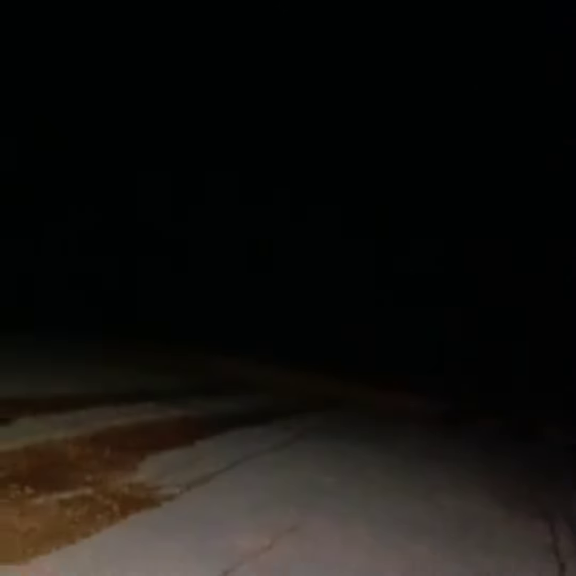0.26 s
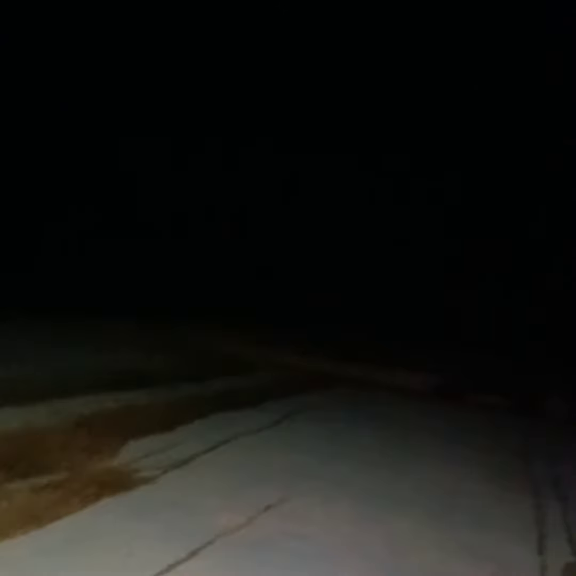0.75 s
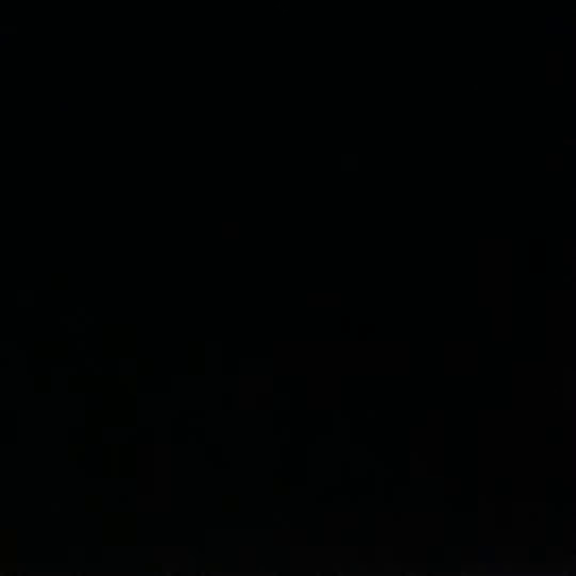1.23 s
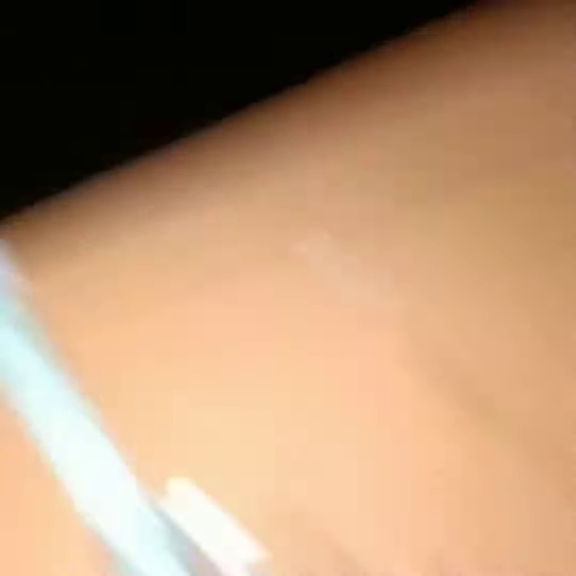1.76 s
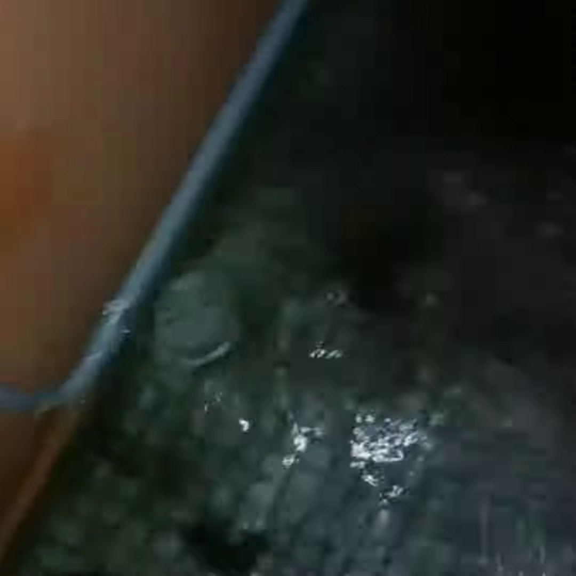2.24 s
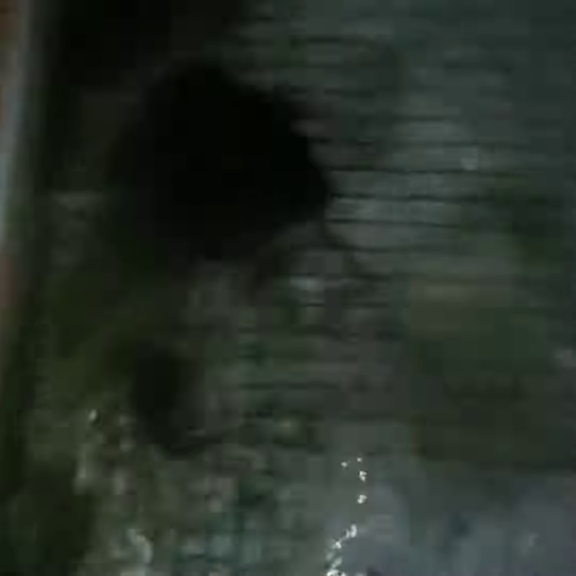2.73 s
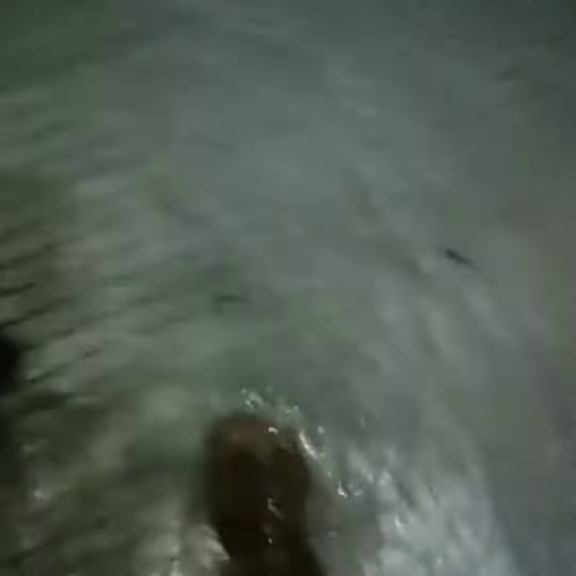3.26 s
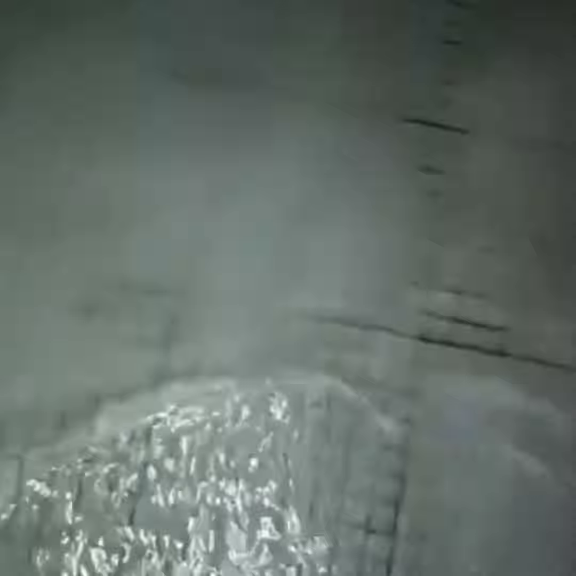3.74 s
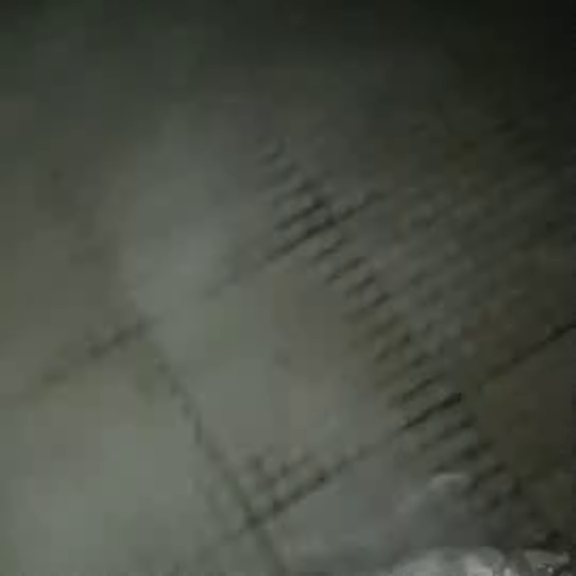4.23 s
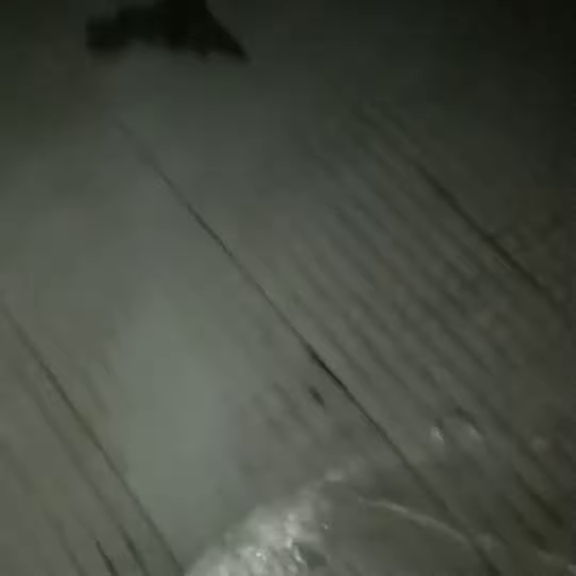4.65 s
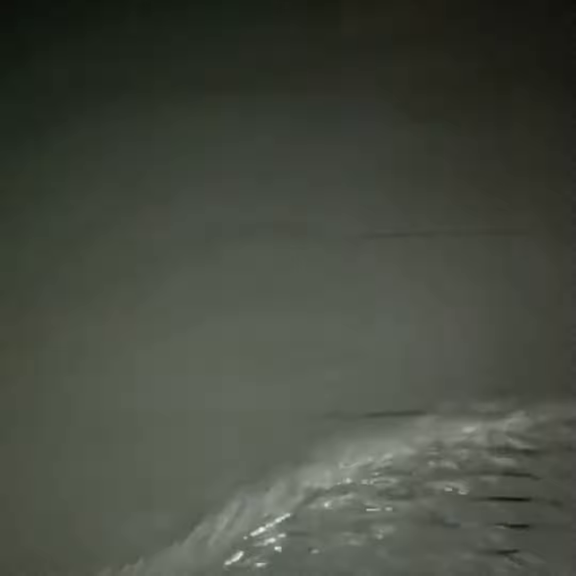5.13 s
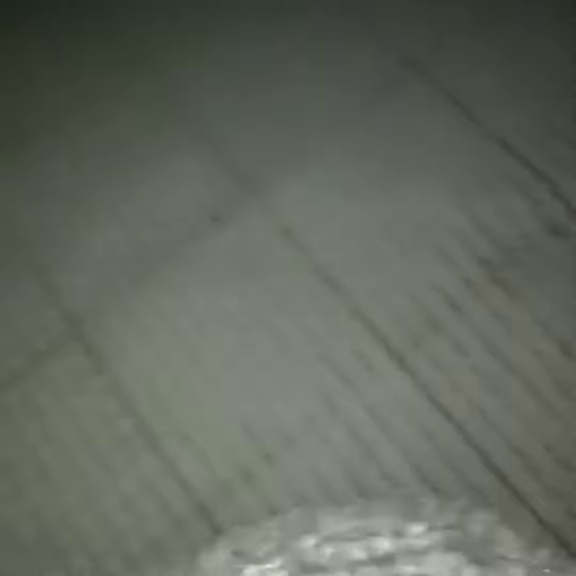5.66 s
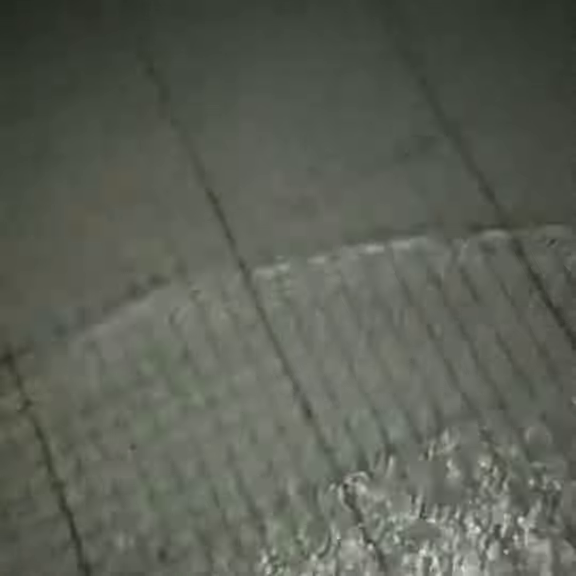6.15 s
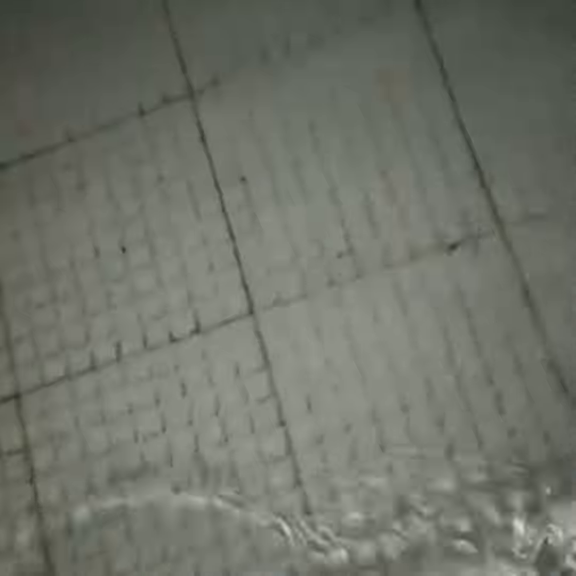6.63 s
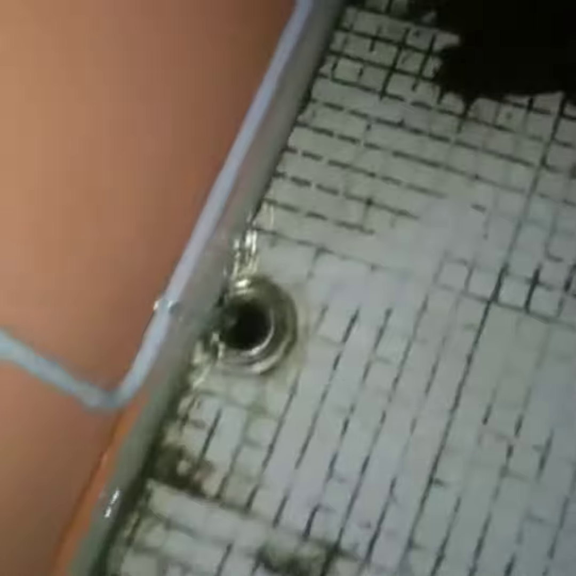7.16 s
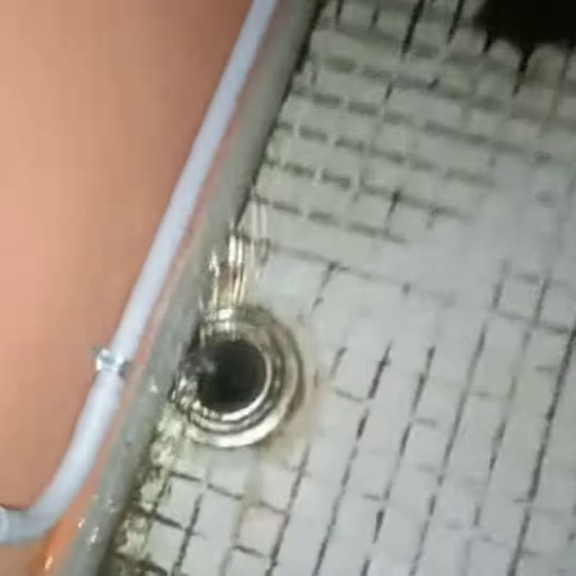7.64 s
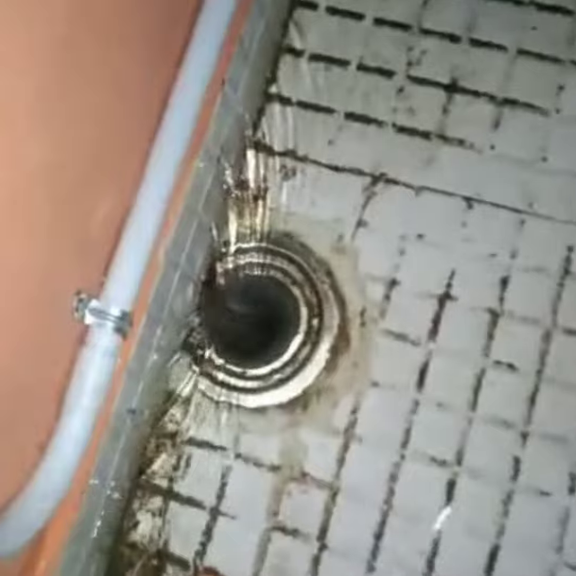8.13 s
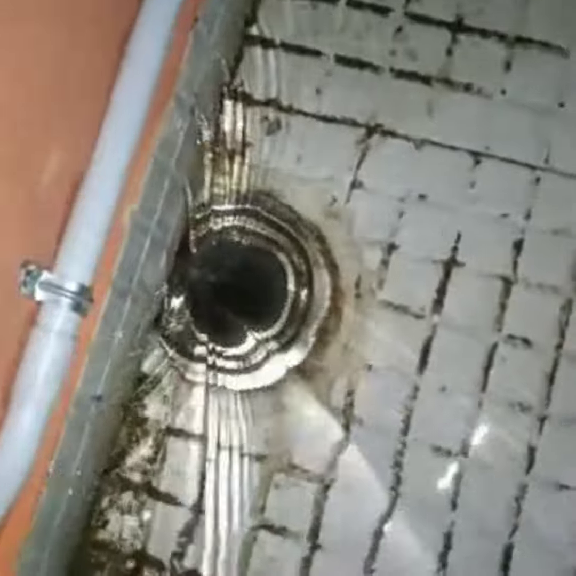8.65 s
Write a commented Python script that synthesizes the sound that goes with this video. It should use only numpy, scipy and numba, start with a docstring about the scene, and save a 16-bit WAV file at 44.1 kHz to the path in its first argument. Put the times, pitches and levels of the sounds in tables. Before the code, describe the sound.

Quiet night hum with a trilling cricket, then feet slosh and plop through shallow rainwater; brief silence, then water rushes loudly down a floor drain.

```python
"""Low machine hum, town rumble and a trilling cricket at night on a flooded tiled terrace: noise and sines.
Feet wade through shallow rainwater: filtered impacts slosh, decaying sines plop, short rings and puffs tick.
After a short silence the phone is close to a floor drain: impacts through drifting pipe resonances rush,
sliding sines glug, noise booms, and delayed copies echo off the tiles and kerb."""
import sys
import numpy as np
from scipy import signal
from scipy.fft import rfft, irfft
from scipy.io import wavfile
from scipy.ndimage import uniform_filter1d, map_coordinates
from numba import njit

SR = 44100
rng = np.random.default_rng(int(sys.argv[2]) if len(sys.argv) > 2 else 0)


def persist_wave(psi):
    """Save psi, clipped to +-1, as 16-bit WAV."""
    counts = np.round(np.clip(psi, -1, 1) * 32767).astype(np.int16)
    wavfile.write(sys.argv[1], SR, np.atleast_2d(counts).T)


N = 392049

# night layers: t/s, rumble level/dB, hum level/dB, far hiss level/dB
NIGHT_LEVELS = [(0.0, -44.5, -43, -49), (1.06, -42.5, -43, -56.5), (1.7, -43.5, -46, -56),
                (2.26, -42, -50, -57), (2.88, -40, -37, -53.5), (3.3, -46, -48.5, -49),
                (4.25, -45.5, -44.5, -57.5), (4.47, -45, -37, -52), (5.7, -45, -41.5, -55.5),
                (6.33, -44, -46, -54.5), (6.55, -40.5, -57, -52)]
# rumble spectrum: f/Hz, level/dB per Hz
RUMBLE_SPECTRUM = [(12, -66), (20, -31.5), (37, -20), (82, -7), (129, -3), (150, -2), (195, -7), (241, -5),
                   (299, -9.5), (600, -15), (780, -25.5), (1320, -52)]
# weaker steady hums: f/Hz, level/dB
WEAK_HUMS = [(75.3, -54), (100, -51), (113, -48), (125, -54), (188, -56), (226, -54), (243, -54)]
# far insects and dripping roofs, spectrum: f/Hz, level/dB per Hz
FAR_SPECTRUM = [(290, -33.5), (500, -12), (890, -7), (1150, -1.5), (2300, 1.5), (4160, -30), (5320, -1),
                (5630, -13), (6050, -19.5), (7730, -10), (10800, -52), (14800, -48.5), (15700, -46.5)]
# chirps of the near cricket: t/s, level/dB
CHIRP_EVENTS = [(.005, -53), (.056, -48), (0.106, -48), (.19, -45.5), (.285, -48), (.376, -48),
                (0.456, -49), (.488, -50), (.545, -49), (.566, -49), (.658, -46.5), (.729, -49),
                (.821, -52), (.913, -52.5), (1.014, -51), (1.1, -60), (1.2, -59), (1.292, -62), (1.38, -64),
                (1.5, -59)]
# wing strokes of one chirp: level/dB re chirp
STROKE_LEVELS_DB = [3, 1.5, -3.5, -10]
# thin hisses: start t/s, end t/s, level/dB, low f/Hz, high f/Hz
AIRY_BANDS = [(.82, 1.7, -67, 12800, 17000), (.46, 1.2, -63.5, 6900, 8100)]
# wading: t/s, slosh level/dB, spray level/dB re slosh, fizz level/dB re slosh
WADE_LEVELS = [(0.0, -56, 0, 0), (0.85, -51, -12.5, -8.5), (1.15, -44, -17.5, -17.5),
               (1.5, -49, -17.5, -15), (1.9, -47, -14, -18), (2.19, -35.5, -17, -21),
               (2.52, -40.5, -15, -10.5), (2.66, -40.5, -16, -12), (2.81, -44.5, -15.5, -14),
               (3.08, -41, -14, -12.5), (3.24, -29.5, -21, -21), (3.45, -41, -16.5, -7.5),
               (3.98, -43, -18, -12.5), (4.07, -35.5, -20, -15), (4.5, -42.5, -15.5, -10.5),
               (4.9, -44, -19.5, -12.5), (5.1, -33.5, -23.5, -15), (5.45, -35.5, -24, -25),
               (5.62, -34, -21.5, -16), (5.87, -34.5, -21, -24.5), (6.0, -46.5, -19, -15.5),
               (6.1, -47.5, -14.5, -18), (6.2, -37.5, -24, -27), (6.32, -38.5, -19, -21),
               (6.4, -32, -20.5, -15), (6.55, -39.5, -18.5, -17)]
# slosh spectrum: f/Hz, level/dB per Hz
SLOSH_SPECTRUM = [(120, -55.5), (200, -19.5), (241, -8.5), (308, -2.5), (415, -4.5), (888, -3),
                  (1290, -4.5), (2030, -2.5), (2800, -12.5), (3640, -36.5), (6160, -120)]
# spray spectrum: f/Hz, level/dB per Hz
SPRAY_SPECTRUM = [(3500, -31), (5000, -4), (6200, -16.5), (7500, -12.5), (9200, -8), (10800, -17),
                  (14800, -23), (15700, -25)]
# spray drops on tiles: t/s, ring peak level/dB, ring f/Hz, splat level/dB
TICK_EVENTS = [(0.9113, -37, 10100, -37), (1.659, -35, 9500, -33.5), (1.7815, -31, 10500, -59),
               (1.821, -37, 9300, -28), (2.062, -38, 4500, -45), (2.081, -41, 7400, -34),
               (2.18, -34, 5940, -34), (2.2398, -37, 8870, -31), (2.264, -33, 8100, -47),
               (2.3192, -32, 8950, -33), (2.326, -35, 5100, -54), (2.345, -34, 3800, -47),
               (2.373, -36, 7960, -40.5), (2.4122, -32, 8650, -27), (2.428, -40, 4670, -36),
               (2.439, -29, 9200, -29), (2.4687, -32, 8700, -59), (2.5084, -36, 9400, -38),
               (2.604, -36, 6750, -30), (3.154, -45, 7400, -26), (3.42, -35, 8400, -45),
               (3.4746, -36, 8900, -52), (3.5336, -39, 9000, -30), (4.3046, -33.5, 8920, -60),
               (4.9044, -38, 6900, -29), (5.3527, -39, 5050, -36), (5.624, -53, 9250, -21.5),
               (5.667, -41, 7300, -21.5), (5.726, -34, 8650, -27), (5.8697, -37, 8790, -59),
               (6.453, -40, 8790, -54)]
# big bubbles: t/s, peak level/dB, f/Hz, life/ms (clipped to 26), pitch rise/share per life
PLOP_EVENTS = [(1.556, -40, 2110, 4.4, 0.033), (1.643, -18.5, 754, 9.1, -0.13),
               (1.652, -21, 1314, 7.7, 0.2), (1.672, -31, 810, 6.1, -0.047), (1.691, -17.5, 710, 5.8, 0.11),
               (1.709, -29, 2620, 1.8, -0.43), (1.719, -27.5, 450, 11, 0.14),
               (1.757, -39.5, 2730, 5.3, 0.1), (1.826, -24.5, 1433, 11, 0.013),
               (1.882, -33, 2040, 5, 0.054), (1.925, -32.5, 724, 12, 0.22), (1.953, -34, 2940, 3.2, -0.037),
               (1.956, -20, 1550, 6.3, -0.19), (1.971, -26.5, 696, 8.6, 0.3),
               (1.973, -29, 2070, 7.2, -0.13), (2.043, -22.5, 809, 24, -0.13),
               (2.055, -19, 1830, 5.6, -0.35), (2.066, -21.5, 2480, 2.4, -0.073),
               (2.079, -21.5, 1747, 16, -0.42), (2.095, -23.5, 945, 10.2, 0.61),
               (2.074, -28, 800, 14, -0.021), (2.125, -34, 1950, 4, -0.11), (2.094, -33, 2900, 3.5, 0.006),
               (2.136, -14.5, 2100, 4.3, -0.071), (2.169, -29, 1040, 4.8, -0.065),
               (2.177, -26.5, 3050, 3.1, 0.04), (2.183, -19, 916, 16, -0.025),
               (2.241, -28.5, 2580, 5.1, -0.041), (2.255, -25.5, 1080, 6.3, -0.072),
               (2.287, -19.5, 910, 3.3, -0.33), (2.291, -31, 3240, 3.7, -0.068),
               (2.3, -28, 2300, 4.3, -0.18), (2.317, -20.5, 790, 3.7, 0.29), (2.348, -30.5, 904, 16, -0.1),
               (2.305, -26, 1610, 6.7, -0.067), (2.365, -25, 770, 13.7, 0.25),
               (2.376, -19, 2210, 4, -0.082), (2.41, -30, 1550, 3.8, 0.062),
               (2.425, -21.5, 1475, 6.2, 0.089), (2.441, -20.5, 1400, 5.7, 0.11),
               (2.443, -12.5, 2014, 5, 0.025), (2.455, -30.5, 760, 12, 0.035),
               (2.498, -31, 850, 9.3, 0.064), (2.52, -28.5, 720, 10, 0.041), (2.521, -29, 1460, 4, -0.11),
               (2.534, -29, 1900, 4.5, 0.12), (2.544, -22, 2640, 2.1, 0.088),
               (2.567, -29.5, 620, 15, 0.038), (2.569, -27, 1550, 3, 0.2), (2.606, -14, 1774, 4.4, 0.088),
               (2.608, -30, 630, 32, 0.19), (2.72, -27, 710, 6.7, -0.038), (2.758, -27.5, 2050, 1.1, -0.17),
               (2.76, -17, 535, 5.6, -0.054), (3.019, -27, 1910, 5.9, 0.1), (3.071, -33, 1210, 5, -0.049),
               (3.104, -21, 460, 3.8, -0.062), (3.15, -19.5, 1600, 3.5, -.12),
               (3.188, -25.5, 1305, 10.6, 0.16), (3.214, -22, 2160, 5.6, -0.051),
               (3.225, -19.5, 1930, 3, -0.016), (3.246, -26.5, 1240, 16, -0.34),
               (3.257, -29, 505, 17, 0.14), (3.27, -22.5, 734, 11, -0.033), (3.312, -32, 1980, 5.4, 0),
               (3.368, -31, 2070, 5.7, 0.056), (3.418, -28, 2410, 4, 0.031), (3.42, -35.5, 2960, 7.3, 0.24),
               (3.436, -22, 2250, 1.7, -0.13), (3.529, -36, 1270, 30, .14), (3.544, -28.5, 1590, 4.5, -0.1),
               (3.668, -34, 2150, 8, -0.077), (3.721, -39, 985, 15, 0), (3.826, -39, 2210, 8.2, 0),
               (3.874, -35, 824, 6, 0.17), (3.887, -27.5, 940, 4.1, 0.055), (4.031, -27, 1610, 11, -0.062),
               (4.031, -20.5, 1200, 9.1, -0.11), (4.1, -32.5, 1056, 30, 0.053),
               (4.151, -31, 915, 8.4, 0.083), (4.172, -24, 604, 4.9, -0.067),
               (4.245, -25, 675, 12.5, -0.03), (4.268, -31, 700, 7, -0.28), (4.293, -30, 934, 4.4, -0.4),
               (4.321, -30, 715, 8, 0.054), (4.346, -30, 1610, 3, -0.033), (4.41, -31, 800, 5.5, -0.13),
               (4.383, -32.5, 670, 19, -0.14), (4.451, -23, 1470, 1.7, 0.72),
               (4.467, -32.5, 818, 20, -0.085), (4.667, -32, 2030, 9.8, 0.018),
               (4.792, -32, 1340, 4.3, -0.028), (4.982, -22, 1076, 8.7, 0.037),
               (5.034, -23.5, 1265, 12, -0.028), (5.09, -28, 818, 20, 0.8), (5.053, -19.5, 1250, 4, -0.19),
               (5.115, -18.5, 1160, 4.5, -0.092), (5.124, -21, 1400, 3.5, -0.49),
               (5.172, -20.5, 1010, 4.8, 0.17), (5.245, -31, 1210, 26, 0.0082),
               (5.27, -27, 806, 11.5, -0.072), (5.352, -23, 2050, 2.7, 0.035),
               (5.378, -24.5, 2040, 8, -0.012), (5.403, -19.5, 1750, 9.3, -0.054),
               (5.421, -18.5, 2240, 9.3, -0.18), (5.424, -25, 1530, 7.6, -0.35),
               (5.494, -26.5, 995, 10.6, 0.65), (5.54, -23.5, 780, 24.5, 1), (5.62, -23, 2000, 3, 0.13),
               (5.66, -31.5, 490, 15, -0.17), (5.67, -22, 2100, 3.9, -0.095), (5.696, -33, 1053, 31, 0.33),
               (5.801, -16, 1875, 8, -0.18), (5.806, -23, 1880, 5.7, 0.31), (5.813, -13, 1400, 5.9, 0.37),
               (5.848, -29.5, 860, 20, -0.79), (5.859, -25.5, 422, 28, 0.048),
               (5.964, -26, 1490, 7.1, 0.12), (6.123, -32.5, 716, 7.2, -0.16),
               (6.169, -27, 852, 9.4, -0.0047), (6.194, -27, 710, 7.6, -0.14), (6.294, -33, 970, 11, -0.12),
               (6.145, -21, 1005, 6.2, -0.032), (6.181, -21, 1610, 10, -0.21),
               (6.359, -13, 1460, 1.3, 0.14), (6.371, -26, 1710, 7.6, 0), (6.414, -26, 1520, 6.5, 0.26),
               (6.498, -32, 1910, 9.4, -0.052), (6.517, -27, 1580, 6.6, 0.022),
               (6.559, -20, 610, 2.2, -0.07), (6.552, -26.5, 1160, 27, 0.48),
               (6.621, -23, 1750, 3.4, -0.15), (6.65, -28, 1350, 5.5, 0.03)]
# drain: t/s, rush level/dB
DRAIN_LEVELS = [(6.96, -23.5), (7.324, -19.5), (7.5, -21), (8.652, -19), (8.75, -20.5), (8.862, -18.5)]
# rush spectrum: f/Hz, level/dB per Hz
RUSH_SPECTRUM = [(150, -17), (250, -1.5), (313, -8.5), (443, -9), (983, -11.5), (1370, -21), (2020, -2),
                 (2450, -26), (2810, -11), (3200, -15), (3480, -17), (3820, -22), (4250, -81), (6000, -38),
                 (7800, -28.5), (13200, -120)]
# drain pipe air, shifting as the phone nears: first f/Hz, last f/Hz, width/Hz, first level/dB, last level/dB
PIPE_MODES = [(796, 646, 100, -10.5, -24), (1254, 1028, 230, -0.5, -5), (1524, 1446, 164, -4.5, -7.5),
              (1795, 1930, 170, -4, -11), (1952, 2018, 300, 2.5, 1)]
# drain fizz spectrum: f/Hz, level/dB per Hz
FIZZ_SPECTRUM = [(2350, -40), (4000, 4.5), (4240, -6), (4480, 1.5), (4830, -4.5), (5800, -6.5),
                 (7990, -4.5), (9160, 8.5), (10500, -7.5), (13400, -13), (15700, -17)]
# tile and kerb echoes: lag/ms, drift/ms as the hand moves, level/dB
DRAIN_ECHOES = [(0.548, 0.06, -9), (1.902, 0.08, -9), (2.4, .08, -9.5), (3.2, 0.08, -5)]
# pipe boom spectrum: f/Hz, level/dB per Hz
BOOM_SPECTRUM = [(12, -76), (20, -48), (37, -24), (62, -15.5), (80, 2), (152, 2), (248, -7), (311, -22.5),
                 (400, -9.5), (520, -49), (880, -120)]
# glugs: t/s, peak level/dB, f/Hz
GLUG_EVENTS = [(6.991, -9, 1900), (7.067, -9, 1220), (7.079, -10, 1950), (7.123, -9, 1930),
               (7.176, -15, 1960), (7.252, -17, 1900), (7.317, -12, 1830), (7.383, -20, 1930),
               (7.527, -16, 1900), (7.537, -7, 1830), (7.634, -9, 2020), (7.644, -9, 1200),
               (7.769, -9, 1090), (7.878, -8, 1120), (7.946, -6.5, 2000), (8.025, -12.5, 1100),
               (8.056, -10, 2030), (8.136, -7, 2000), (8.243, -4.5, 1940), (8.272, -7, 1070),
               (8.314, -7.5, 1870), (8.428, -8, 1850), (8.643, -7, 1920), (8.727, -15, 2100),
               (8.852, -6, 750), (8.861, -12, 1970)]

SILENCE_START_S, SILENCE_END_S = 6.666, 6.956
TOP_HZ = 15800
HUM_HZ = 151.2
CHIRP_HZ, STROKES_PER_S, CHIRP_FALL_HZ_PER_LIFE = 5730, 49, 622
BUBBLE_HZ, BUBBLE_WANDER_OCT, BUBBLE_WANDERS_PER_S = 1144, 0.509, 8
GURGLE_DB, STIRRED_FROM_S = -4.5, 1.55
PATCH_DB, PATCH_S, PATCH_OCT = 4, .035, 0.451
PING_DB, PING_HZ, PING_OCT = -12.5, 8950, .25
WOBBLE_DB, WOBBLES_PER_S = 1.8, 300
SPATTER_DB, SPATTER_S, SPATTER_HZ = -20, 0.012, 1897  # level re plop peak
PIPE_DB = 1.5
FIZZ_DB, FIZZ_START_DB, FIZZ_BUILD_S = -17.5, -3.5, 0.16  # start re final level
MIST_DB, MIST_HZ, MIST_PEAK_S, MIST_SLOPE_DB_PER_S = -19.5, 6500, 0.26, 24
GUST_DB, GUSTS_PER_S = 1.1, 40
BOOM_DB, BOOM_GROWS_DB_PER_S = -8.5, 1  # the phone comes nearer to the pipe mouth
GLUG_LIFE_MS, GLUG_RISE_SHARE = 3.8, 0.013
KNOCK_DB, KNOCK_MS = -1.5, 1


def undb(db):
    """Amplitude from dB."""
    return 10 ** (np.asarray(db) / 20)


def unit(x):
    """Scale to rms 1."""
    return x / np.sqrt(np.mean(x ** 2))


def curves(table):
    """Interpolate each column over time, per sample."""
    s, *columns = np.transpose(table)
    return [np.interp(np.arange(N) / SR, s, c) for c in columns]


def colour(x, spectrum):
    """Causal minimum-phase filter of the given shape, from the folded cepstrum; rms 1."""
    hz, db = np.transpose(spectrum)
    log_hz = np.log(np.maximum(np.fft.rfftfreq(8192, 1 / SR), 1))
    shape_db = np.interp(log_hz, np.log(hz), db, left=db[0] - 30.5, right=db[-1] - 37.0)
    cepstrum = irfft(shape_db * np.log(10) / 20)
    cepstrum[1:4096] *= 2
    response = irfft(np.exp(rfft(cepstrum[:4097], 8192)))
    return unit(signal.fftconvolve(x, response)[:N])


def bandpass(x, order, low_hz, high_hz):
    """Butterworth band-pass."""
    return signal.sosfilt(signal.butter(order, [low_hz, high_hz], "band", fs=SR, output="sos"), x)


def highpass(x, order, hz):
    """Butterworth high-pass."""
    return signal.sosfilt(signal.butter(order, hz, "high", fs=SR, output="sos"), x)


def walk(rate):
    """Straight ramps between random levels, one every 1 / rate s; rms 1."""
    k = int(SR / rate)
    held = np.repeat(rng.standard_normal(N // k + 1), k)
    return unit(uniform_filter1d(held, k)[:N])


def sizes(spread_db, count):
    """Amplitudes: many small, few large, none huge."""
    return undb(spread_db * np.minimum(rng.exponential(size=count), 3.5))


def patter(rate, spread_db, hiss):
    """Random droplet impacts over a share of smooth hiss."""
    hits = (rng.random(N) < rate / SR) * rng.standard_normal(N) * sizes(spread_db, count=N)
    return unit(hits) + hiss * rng.standard_normal(N)


def sizzle(rate, spread_db, hiss):
    """Droplets as brief soft-edged puffs of noise over smooth hiss."""
    hits = (rng.random(N) < rate / SR) * sizes(spread_db, count=N)
    puffs = signal.fftconvolve(hits, np.hanning(SR // 200), "same")
    return (unit(puffs) + hiss) * rng.standard_normal(N)


@njit
def ring(n, start, size, hz, life_s, rise, swell, fade):
    """Sines that swell, fade over their life and slide in pitch, as bubbles do near the surface."""
    y = np.zeros(n)
    for k in range(len(start)):
        length, phase = life_s[k] * SR, 0.
        for i in range(min(int(3 * length), n - start[k])):
            u = i / length
            phase += 2 * np.pi * hz[k] * (1 + rise[k] * min(u, 1.2)) / SR
            envelope = min(u / swell, 1.) * np.exp(-fade * max(u - swell, 0.) ** 1.5)
            y[start[k] + i] += size[k] * np.sin(phase) * envelope
    return y


def big_bubbles(s, db, hz, life_ms, rise, swell, fade):
    """Single bubbles at given times, lives held to 1-26 ms."""
    life_s = np.clip(life_ms, 1, 26) / 1000
    return ring(N, (s * SR).astype(np.int64), undb(db), hz, life_s, rise, swell, fade)


def swarm(centre_hz, octaves, cycles, spread_db, count):
    """Many small bubbles scattered in time, with pitches around a moving centre; rms 1."""
    when, life, slide = rng.random((count, 3)).T
    start = (when * N).astype(np.int64)
    hz = np.clip(centre_hz[start] * 2 ** (octaves * rng.standard_normal(count)), 350, 3400)
    life_s = cycles * (0.61 + life) / hz
    return unit(ring(N, start, sizes(spread_db, count=count), hz, life_s, 0.312 * slide - .1, 0.12, 0.62))


def machine_hum(level_db):
    """Machine hums: steady sines, each drifting in level."""
    t = np.arange(N) / SR
    hum = undb(level_db + .7 * walk(3)) * np.sin(2 * np.pi * HUM_HZ * t)
    for hz, db in WEAK_HUMS:
        hum = hum + undb(db + 2 * walk(1.5)) * np.sin(2 * np.pi * hz * t)
    return np.sqrt(2) * hum  # dB are rms


def town_rumble(level_db):
    """Town rumble: low coloured noise of wandering level."""
    return colour(rng.standard_normal(N), RUMBLE_SPECTRUM) * undb(level_db + 1.1 * walk(5.4))


def far_hiss(level_db):
    """Blurred hiss of far insects and dripping roofs: coloured noise."""
    return undb(level_db) * colour(rng.standard_normal(N), FAR_SPECTRUM)


def cricket():
    """Chirps of a few wing strokes, each a short tone that falls in pitch; walls nearby echo them."""
    chirp_s, chirp_db = np.transpose(CHIRP_EVENTS)
    s = (chirp_s[:, None] + np.arange(len(STROKE_LEVELS_DB)) / STROKES_PER_S).ravel()
    db = (chirp_db[:, None] + STROKE_LEVELS_DB).ravel()
    size = undb(db + 1.2 * rng.standard_normal(len(s)))
    hz = CHIRP_HZ * (1 + 0.0166 * rng.standard_normal(len(s)))
    fall = -CHIRP_FALL_HZ_PER_LIFE / hz
    strokes = ring(N, (s * SR).astype(np.int64), size, hz, np.full(len(s), 0.0105), fall, 0.44, 1.3)
    direct = strokes * undb(2.5 * walk(400))  # rough wings
    first_echo = undb(-6.5) * np.roll(direct, int(0.01 * SR))
    return direct + first_echo + undb(-9) * np.roll(direct, int(0.024 * SR))


def slosh(stirred):
    """Sloshing water: impacts, small bubbles once the feet stir it, and bursting droplets."""
    centre_hz = BUBBLE_HZ * 2 ** (BUBBLE_WANDER_OCT * walk(BUBBLE_WANDERS_PER_S))
    wash = colour(patter(1700, 1.1, 0.69), SLOSH_SPECTRUM) * undb(2 * walk(40))
    gurgle = colour(swarm(centre_hz, 0.5944, 12, 2.0, count=1500), SLOSH_SPECTRUM)
    # droplets burst after a few cycles
    crackle = colour(swarm(1.287 * centre_hz, 0.592, 3.93, 0.99, count=5000), SLOSH_SPECTRUM)
    mix = undb(-13) * wash + stirred * undb(GURGLE_DB) * gurgle + undb(-3) * crackle
    return undb(stirred * walk(16)) * mix


def spray(stirred):
    """Treble spray: noise puffs over hiss, plus tiny ringing droplets once the water is stirred."""
    puffs = colour(sizzle(83, 3.7, 3.9), SPRAY_SPECTRUM) * undb(walk(30))
    return puffs + stirred * undb(PING_DB) * pings(count=400)


def pings(count):
    """Tiny droplets, each a few cycles of a high tone; rms 1."""
    hz = np.clip(PING_HZ * 2 ** (PING_OCT * rng.standard_normal(count)), 4000, 15000)
    start = rng.integers(N, size=count)
    return unit(ring(N, start, sizes(3, count=count), hz, 9 / hz, 0 * hz, .5, 2.))


def wading_fizz():
    """Fizz of the stepped water: dense impacts in one band, of fluttering level."""
    return unit(bandpass(patter(2500, 2.5, 1.6), 4, 2300, 3900)) * undb(1.5 * walk(35))


def patchy(x):
    """Each small region of pitch and time gets louder or softer on its own; rms kept."""
    hz, s, z = signal.stft(x, SR, nperseg=256)
    rows, columns = np.meshgrid(np.log2(1 + hz / 200) / PATCH_OCT, s / PATCH_S, indexing="ij")
    field = map_coordinates(rng.standard_normal((40, 1000)), [rows, columns], order=1, mode="wrap")
    patched = signal.istft(z * undb(PATCH_DB * field), SR, nperseg=256)[1][:N]
    return unit(patched) * np.sqrt(np.mean(x ** 2))


def airy():
    """Thin high noise bands that shimmer, start at once and fade over their last third."""
    out = 0
    for start_s, end_s, db, low_hz, high_hz in AIRY_BANDS:
        u = (np.arange(N) / SR - start_s) / (end_s - start_s)
        hiss = unit(bandpass(rng.standard_normal(N), 4, low_hz, high_hz)) * undb(db + 2.5 * walk(29.9))
        out = out + hiss * (u > 0) * np.clip(3 * (1 - u), 0, 1)
    return out


def night():
    """Town rumble, machine hums, one near cricket, thin hisses and the far hiss summed."""
    rumble_db, hum_db, far_db = curves(NIGHT_LEVELS)
    return machine_hum(hum_db) + town_rumble(rumble_db) + far_hiss(far_db) + cricket() + airy()


def drops():
    """Spray hits the tiles: a short bright ring and a broad splat."""
    s, db, hz, splat_db = np.transpose(TICK_EVENTS)
    start = (s * SR).astype(np.int64)
    rings = ring(N, start, undb(db), hz, 12 / hz, 0 * s, 0.45, 1.7)
    blows = np.zeros(N)
    blows[start] = undb(splat_db)
    t = np.arange(SR // 50) / SR
    envelope = np.exp(-t / 0.0029) * np.minimum(t / 0.0021, 1) ** 2
    splat = rng.standard_normal(N) * signal.fftconvolve(blows, envelope)[:N]
    return rings + bandpass(splat, 1, 1500, 9000)


def spatter():
    """Each big bubble comes amid a short shower of droplets, from a little before it."""
    s, db = np.transpose(PLOP_EVENTS)[:2]
    blows = np.zeros(N)
    np.add.at(blows, (s * SR).astype(np.int64), undb(db + SPATTER_DB))
    t = np.arange(-SR // 20, SR // 20) / SR
    spread = np.exp(-np.abs(t) / np.where(t < 0, 0.33 * SPATTER_S, SPATTER_S))
    shower = signal.fftconvolve(blows, spread, "same")
    return shower * swarm(np.full(N, float(SPATTER_HZ)), 0.474, 3.6, 1.3, count=4000)


def plops():
    """Big bubbles: decaying sliding sines, their ring broken up by ripples."""
    return big_bubbles(*np.transpose(PLOP_EVENTS), 0.32, 1.3) * undb(WOBBLE_DB * walk(WOBBLES_PER_S))


def wall_tail(near):
    """Terrace walls smear the near sounds: decaying noise, 60 dB down in 0.13 s."""
    t = np.arange(SR // 5) / SR
    tail = rng.standard_normal(len(t)) * 1000 ** (-t / 0.13) * (t > .003)
    return undb(-7) * signal.fftconvolve(near, tail / np.sqrt(np.sum(tail ** 2)))[:N]


def wading():
    """Patchy slosh, spray and fizz under near plops, spatter and drops with their wall tail."""
    db, spray_db, fizz_db = curves(WADE_LEVELS)
    stirred = np.arange(N) / SR > STIRRED_FROM_S
    water = slosh(stirred) + undb(spray_db) * spray(stirred) + undb(fizz_db) * wading_fizz()
    near = drops() + plops() + spatter()
    return undb(db) * patchy(water) + near + wall_tail(near)


@njit
def resonate(x, hz, width):
    """Band-pass with a moving centre, gain 1 at the centre."""
    y, band, low = np.empty(len(x)), 0., 0.
    for i in range(len(x)):
        g, k = np.tan(np.pi * hz[i] / SR), width / hz[i]
        v = (band + g * (x[i] - low)) / (1 + g * (g + k))
        band, low, y[i] = 2 * v - band, low + 2 * g * v, k * v
    return y


def pipe_air(beats, nearer):
    """Impacts excite the air in the pipe: steep resonances of moving pitch and level; rms 1."""
    out = 0
    for hz0, hz1, width, db0, db1 in PIPE_MODES:
        hz = (hz0 + (hz1 - hz0) * nearer) * (1 + 0.0074 * walk(6))
        mode = resonate(resonate(beats, hz, float(width)), hz, float(width))
        out = out + undb(db0 + (db1 - db0) * nearer) * mode / np.sqrt(width)
    return unit(out)


def rush(nearer):
    """Falling water beats on the pipe mouth: dense impacts, froth bubbles and pipe resonances."""
    froth = swarm(np.full(N, 1500.), 0.789, 5.15, 0.6, count=16000) + 0.5 * rng.standard_normal(N)
    beats = patter(2000, 1.8, 1.05)
    fall = undb(-3.0) * colour(beats + undb(-4.0) * froth, RUSH_SPECTRUM)
    return fall + undb(PIPE_DB) * pipe_air(beats, nearer)


def drain_fizz(since_s):
    """Fizz of dense impacts that starts weaker and builds up."""
    level_db = FIZZ_DB + FIZZ_START_DB * np.exp(-since_s / FIZZ_BUILD_S) + walk(50)
    return colour(patter(2800, 2.7, 1.0), FIZZ_SPECTRUM) * undb(level_db)


def mist(since_s):
    """Finest spray: high-passed impacts, swelling to a peak and thinning out."""
    level_db = MIST_DB - MIST_SLOPE_DB_PER_S * np.abs(since_s - MIST_PEAK_S)
    return unit(highpass(patter(2500, 2.5, 1.3), 3, MIST_HZ)) * undb(level_db)


def tile_echoes(water):
    """Tiles and kerb echo the drain at drifting lags; only the short waves bounce back sharply."""
    bright = highpass(water, 2, 2600)
    out, n = 0, np.arange(N)
    for lag_ms, drift_ms, db in DRAIN_ECHOES:
        delay = (lag_ms + drift_ms * walk(3.0)) * SR / 1000
        out = out + undb(db) * np.interp(n - delay, n, bright)
    return out


def boom(db, since_s):
    """Boom of the pipe: low coloured noise that grows relative to the rush."""
    level_db = db + BOOM_DB + BOOM_GROWS_DB_PER_S * since_s + 1.1 * walk(16)
    return colour(rng.standard_normal(N), BOOM_SPECTRUM) * undb(level_db)


def glugs():
    """Bubbles in the drain, each started by a shorter slap at the same pitch."""
    s, db, hz = np.transpose(GLUG_EVENTS)
    life_ms, rise = np.full(len(s), GLUG_LIFE_MS), np.full(len(s), GLUG_RISE_SHARE)
    bubbles = big_bubbles(s, db, hz, life_ms, rise, 0.3, 3.6)
    return bubbles + big_bubbles(s, db + KNOCK_DB, hz, np.full(len(s), KNOCK_MS), 0 * s, 0.13, 3.)


def drain():
    """Fluttering flow of rush, fizz and mist with its echoes, plus boom and glugs."""
    db, = curves(DRAIN_LEVELS)
    since_s = np.maximum(np.arange(N) / SR - SILENCE_END_S, 0)
    nearer = since_s / since_s[-1]
    flow = rush(nearer) + drain_fizz(since_s) + mist(since_s)
    water = undb(db + GUST_DB * walk(GUSTS_PER_S)) * flow
    return water + tile_echoes(water) + boom(db, since_s) + glugs()


def scene():
    """Terrace, silence, then drain."""
    t = np.arange(N) / SR
    return np.where(t < SILENCE_START_S, wading() + night(), (t > SILENCE_END_S) * drain())[None]


def record(dry):
    """The phone rounds the loudest peaks and cuts the top."""
    rounded = np.tanh(.6 * dry) / .6
    return signal.sosfilt(signal.ellip(10, .2, 70, TOP_HZ, fs=SR, output="sos"), rounded)


dry = scene()
out = record(dry)
persist_wave(out)
```